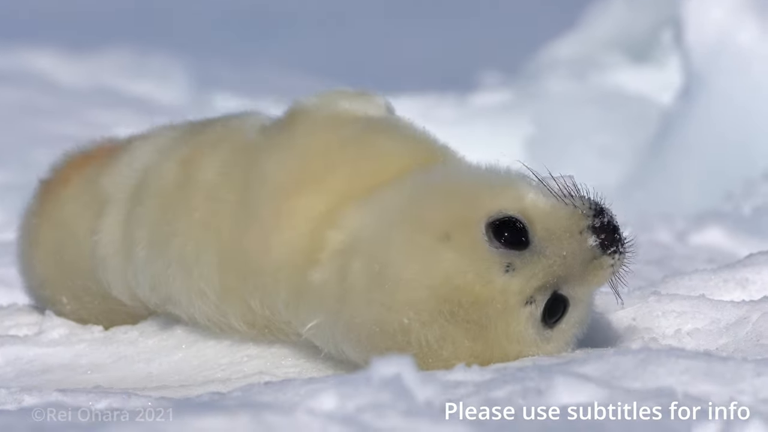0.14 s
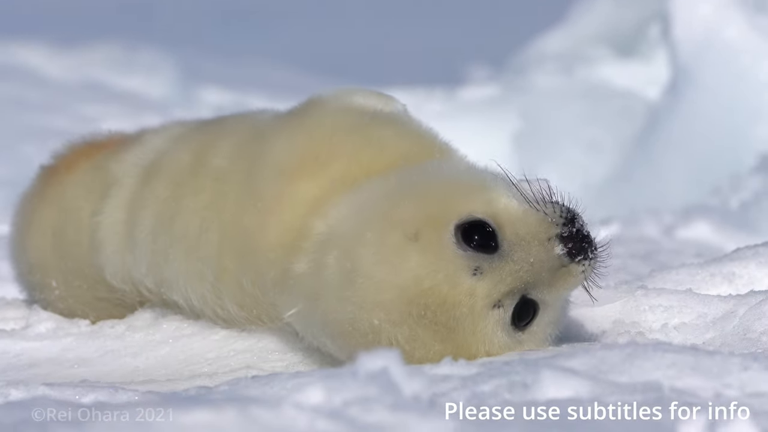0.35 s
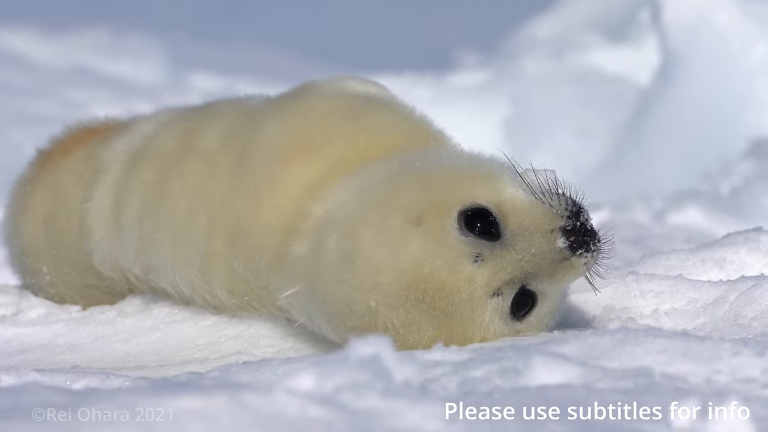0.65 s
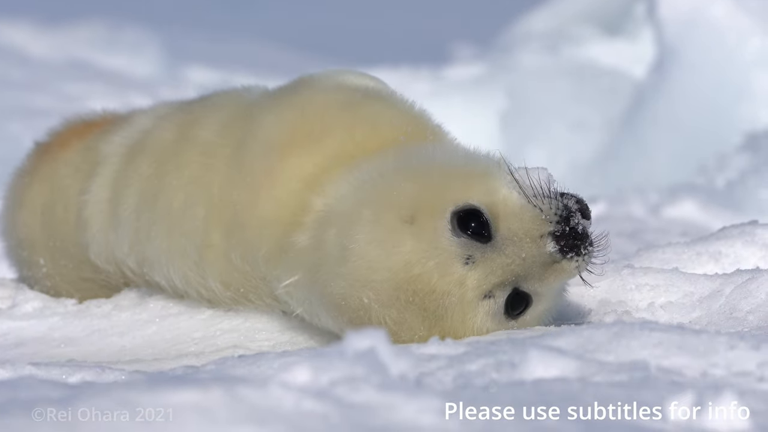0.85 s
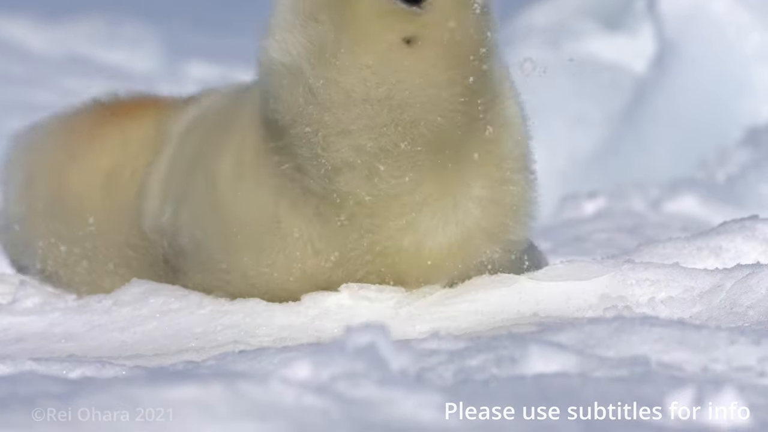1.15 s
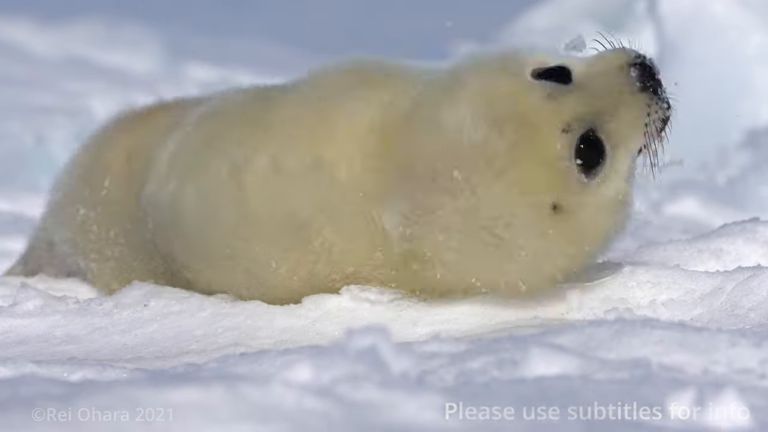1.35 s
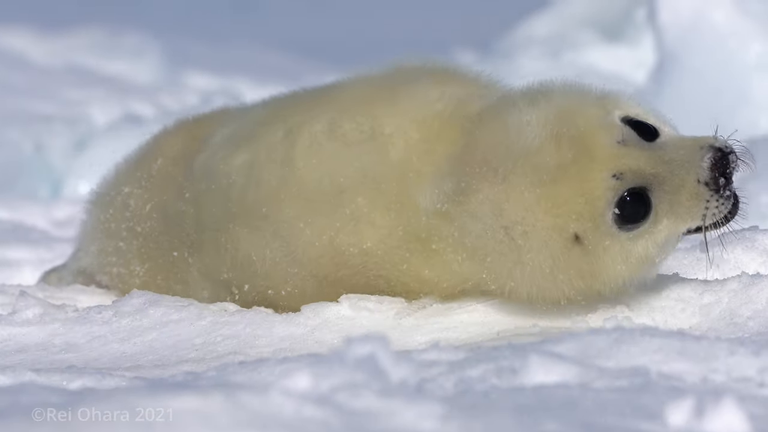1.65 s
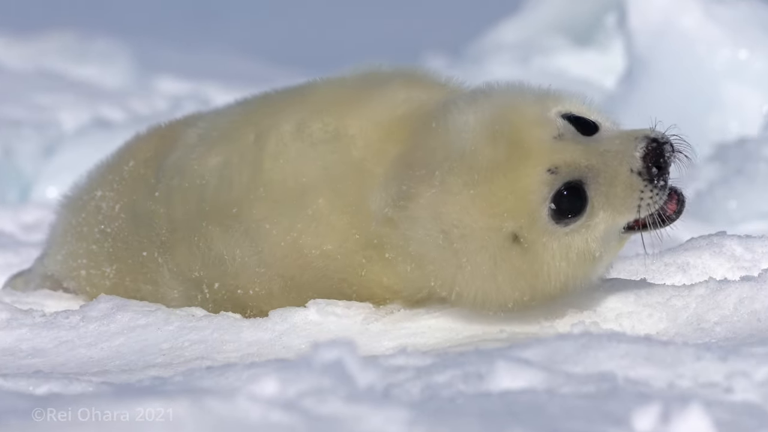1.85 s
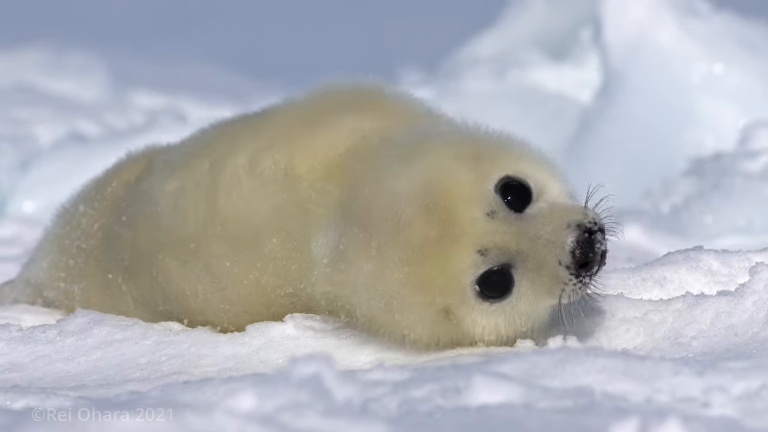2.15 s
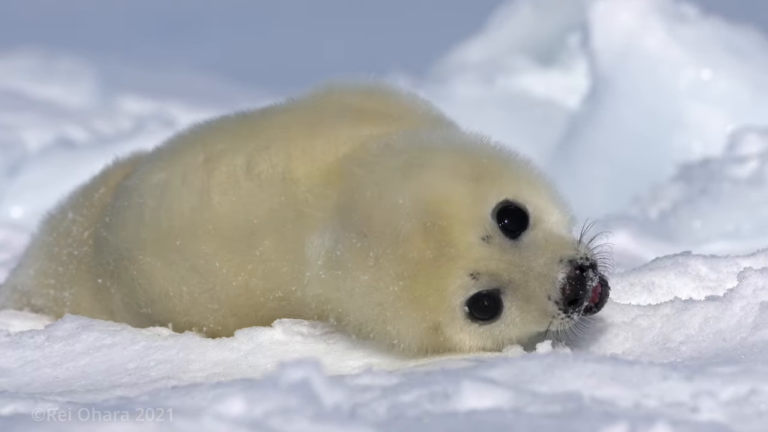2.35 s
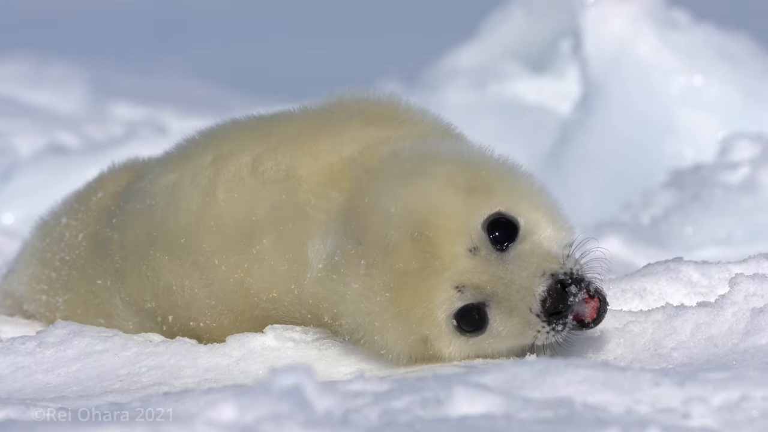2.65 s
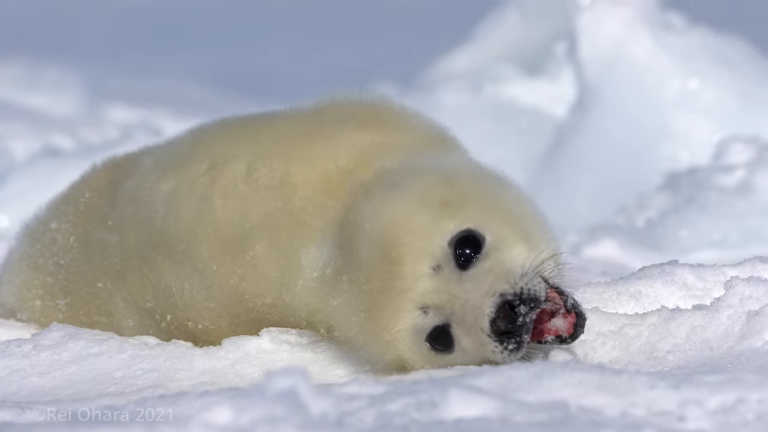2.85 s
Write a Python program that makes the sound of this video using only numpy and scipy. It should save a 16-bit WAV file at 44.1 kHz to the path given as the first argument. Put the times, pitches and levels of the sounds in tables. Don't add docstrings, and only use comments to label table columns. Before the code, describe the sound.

Two hoarse, baby-like seal pup cries break out after a stretch of low, fluttering wind.

```python
import sys
import numpy as np
from scipy import signal
from scipy.fft import rfft, irfft, next_fast_len
from scipy.io import wavfile
from scipy.ndimage import uniform_filter1d

SR = 44100
rng = np.random.default_rng(int(sys.argv[2]) if len(sys.argv) > 2 else 0)


def undo_db(level):
    steps = np.asarray(level, float) / 20
    return 10 ** steps


def master(y):
    cut = np.clip(np.atleast_2d(y).T, -1, 1)
    pcm = np.round(cut * 32767)
    wavfile.write(sys.argv[1], SR, pcm.astype(np.int16))


N = 132300

# time in seconds, pitch in Hz, level in dB,
# mouth opening as a factor on the throat resonances, strain in dB, breath in dB.
FIRST_CRY_SWELLS = [
    (1.54, 182, -75, 0.22, -5, -4),
    (1.575, 215, -60.5, 0.57, -19.5, -12),
    (1.594, 253.2, -51, 0.75, -29, -12),
    (1.62, 339.4, -48, 0.76, -10.5, -7),
    (1.665, 365, -42.5, 0.95, -11.5, -13.5),
    (1.705, 392.9, -37.5, 0.99, -3, -20),
    (1.719, 415, -36.5, 0.91, -13, -19),
    (1.728, 374, -36.5, 1, -6, -18),
]
FIRST_CRY_HELD = [
    (1.744, 399.4, -34, 0.87, -25, -22),
    (1.759, 408.4, -36, 1.08, -6, 3.5),
    (1.781, 412.3, -35, 0.93, -9, -4),
    (1.805, 410, -37, 0.94, -4.5, -2),
    (1.832, 438.6, -35, 0.93, -8.5, -3),
    (1.904, 442.7, -36.5, 0.96, -7, -4.5),
    (1.924, 459.3, -35, 0.97, -9.5, -7.5),
    (1.95, 472.5, -37.5, 1.03, -6.5, -1),
]
FIRST_CRY_CREAKS = [
    (1.958, 331, -41.5, 0.92, -4, -8),
    (1.976, 314.7, -43.5, 0.96, -16, -7),
    (1.996, 287, -49.5, 1, -16, -2),
    (2.011, 249, -52.5, 0.76, -5, 5),
    (2.019, 214, -65, 0.78, -6, 0),
    (2.042, 191, -72, .9, 0, 9),
]
SECOND_CRY = [
    (2.661, 209, -37.5, 0.98, 11.5, 4),
    (2.668, 212.5, -38, 0.89, -2, 5.5),
    (2.696, 241.5, -32.5, 1.08, 2, -7.5),
    (2.72, 310.8, -32, 1.07, 3.5, -11),
    (2.751, 365.8, -33.5, 0.93, 4, -15),
    (2.781, 406.1, -33, 0.99, 4.5, -16),
    (2.821, 425, -33, 1.063, 3, 4),
    (2.87, 443, -32.5, 1.05, -2.7, -2.5),
    (3.0, 460.2, -32.5, 1.052, -0.5, -3.5),
]
# time in seconds, half length in seconds, roughness 0-1, pitch dip as a share.
FOLD_CATCHES = [(1.711, .003, .06, .01), (1.724, .003, .2, .02), (1.738, .004, .08, .0),
                (1.756, .003, .15, .01), (1.772, .005, .5, .04), (1.796, .007, .18, .02),
                (1.954, .003, .4, .0), (2.004, .006, .25, .0), (2.03, .012, .5, .0), (2.705, .012, .07, .0),
                (2.83, .006, .06, .0), (2.958, .007, .07, .003)]
# time in seconds, lift of one high band of harmonics in dB.
LARYNX_LIFT = [(1.6, 8), (1.7, -9), (1.77, 9.5), (1.81, 1), (1.825, -10), (1.915, -12), (1.945, 5.5),
               (1.97, -1), (2.66, -10), (2.7, -7), (2.725, -4), (2.82, 2), (2.9, 0.5), (3.0, -13)]
# resonance in Hz, width in Hz, level in dB.
HEAD_ASIDE = [
    [(420, 460, -10.5), (1210, 277, 5.5), (1700, 396, -2), (2030, 400, -8.5)],
    [(3130, 1160, -15.5), (4160, 1900, -26.5), (6170, 1100, -29)],
    [(7600, 640, -38), (10700, 2600, -48), (13200, 1700, -49)],
]
HEAD_FACING = [
    [(415, 190, -5.5), (1423, 510, 3), (1890, 550, -1), (2420, 260, -7.5)],
    [(3380, 1300, -20.5), (5020, 1780, -24.5), (6260, 440, -27.5)],
    [(8630, 1000, -42.5), (10400, 2600, -49.5), (14500, 1900, -58.5)],
]
# centre in Hz, width in Hz, depth in dB.
SIDE_CAVITIES = [
    (1060, 120, -8),
    (7350, 300, -10),
]
# time in seconds, centre in Hz.
SNOW_ECHO_NOTCH = [(1.76, 14300), (1.81, 13500), (1.88, 12500), (1.96, 12200), (2.665, 8900), (2.72, 10200),
                   (2.8, 11800), (2.9, 12800), (3.0, 13000)]
# start in seconds, level in dB, pitch in Hz.
ICE_PINGS = [
    (2.552, -65.5, 5800),
    (2.556, -48, 1800),
    (2.556, -58.5, 4600),
    (2.557, -67, 6400),
    (2.592, -54.5, 1700),
]
# start in seconds, level in dB.
CRUST_TICKS = [(0.517, -68), (0.7298, -63.5), (1.0904, -73.5), (1.1044, -61), (1.121, -61.5), (1.3747, -62),
               (1.4473, -57), (1.4594, -67.5), (1.48, -61), (1.5329, -57), (2.4317, -65), (2.4626, -61.5),
               (2.5556, -64), (2.5665, -60)]
# start in seconds, level in dB.
FUR_SLIDES = [
    (1.085, -77.5),
    (1.44, -83.5),
    (2.25, -81.5),
]
# frequency in Hz, level in dB.
SNOW_SPECTRUM = [(1500, -18), (3000, -0.5), (5500, -2.5), (10000, -6), (15500, -10)]
# time in seconds, gust level in dB, roar above the rumble in dB.
WIND_GUSTS = [(0.0, -33.5, 3), (0.39, -29, 5.1), (0.42, -23.5, 3.5), (0.81, -31.5, 5.9), (1.04, -24.5, 1.6),
              (1.2, -36.5, 8.2), (1.27, -27.5, -6), (1.39, -36, 0.5), (1.44, -29.5, -3.5), (1.7, -34.5, 3),
              (1.73, -30, -3.2), (2.0, -31.5, 3.7), (2.07, -41, 5.5), (2.31, -44.5, 2.5),
              (2.36, -30.5, -3.3), (2.71, -28.5, 8), (2.77, -43.5, -8.5), (3.0, -43.5, 7.5)]
# frequency in Hz, level in dB.
RUMBLE_SPECTRUM = [(14, -45.5), (26, -12.5), (55, 5.5), (110, -1.5), (236, -17), (450, -37), (1000, -60),
                   (2000, -88.5)]
# start in seconds, peak level in dB.
WINDSCREEN_BUFFETS = [
    (0.407, -20),
    (1.25, -22),
    (1.428, -24),
    (1.57, -26),
    (1.742, -25),
    (1.815, -20),
    (1.965, -22.5),
    (2.119, -34.5),
    (2.346, -27),
    (2.495, -20.5),
]
# start in
# seconds, level in dB.
STRONG_FLAPS = [(0.0333, -83), (0.0633, -89), (0.1116, -59), (0.1605, -66), (0.1878, -58.5), (0.2199, -49.5),
                (0.2698, -56), (0.3172, -56.5), (0.3533, -58), (0.4035, -60.5), (0.423, -67.5),
                (0.4953, -54), (0.5168, -57), (0.5448, -56), (0.6014, -51), (0.631, -78), (0.7014, -68.5),
                (0.7114, -61), (0.749, -60), (0.778, -58.5), (0.815, -79), (0.8435, -72), (0.8675, -59.5),
                (0.9018, -63.5), (0.933, -54.5), (0.9652, -59), (0.974, -56), (1.0246, -65), (1.0355, -53.5),
                (1.076, -73), (1.127, -77.5), (1.1507, -75), (1.1972, -64.5), (1.299, -73), (1.3553, -62.5),
                (1.4194, -65.5), (1.5095, -76), (1.5394, -66.5),
                (0.667, -67), (1.556, -67), (2.016, -54), (2.034, -58), (2.0496, -53), (2.1014, -59.5),
               (2.1462, -63), (2.3494, -76), (2.387, -70.5), (2.427, -66), (2.449, -69), (2.4818, -61.5),
               (2.5162, -81), (2.578, -58), (2.61, -83.5), (2.617, -57), (2.624, -57), (2.639, -55)]
# frequency in Hz, level in dB.
FLAP_SPECTRUM = [(400, 2.5), (800, 2), (1150, -3.5), (1750, 2), (2300, -13), (3200, -23), (4500, -39.5)]
# frequency in Hz, level in dB.
FLUTTER_SPECTRUM = [(500, 6), (900, -1), (1700, -0.6), (2200, -14), (3000, -27.5), (4500, -39.5)]
# frequency in Hz, level in dB.
HISS_SPECTRUM = [(500, 0.5), (1000, -14), (2000, -14), (3000, -21), (5000, -25.5), (9000, -27),
                 (16000, -29.5)]
# frequency in Hz, level in dB.
WHINE_TONES = [(14606, -95)]

ROUGH, CALL_ROUGH = .036, .022
TIRING_DB_PER_S = 24


def evened(x):
    return x / np.sqrt(np.mean(x ** 2) + 1e-20)


def read(points, hz):
    f, value = np.transpose(points)
    return np.interp(np.log(hz + 1), np.log(f + 1), value, left=-90, right=-90)


def colour(x, gain_db):
    size = next_fast_len(len(x) + 2048)
    gain = undo_db(gain_db(np.fft.rfftfreq(size, 1 / SR)))
    return irfft(rfft(x, size) * gain, size)[:len(x)]


def slow(size):
    return evened(uniform_filter1d(uniform_filter1d(rng.standard_normal(N), size), size))


def resonate(x, hz, width):
    turn = np.exp(2j * np.pi * np.cumsum(hz * np.ones(len(x))) / SR)
    r = np.exp(-np.pi * width / SR)
    return 2 * (turn * signal.lfilter([(1 - r) ** 2], [1, -2 * r, r * r], x / turn)).real


def cry(rows, rough, head, tiring_db_per_s):
    s, *columns = np.transpose(rows)
    first = round(s[0] * SR)
    t = np.arange(first, min(N, round(s[-1] * SR))) / SR
    curves = (uniform_filter1d(np.interp(t, s, c), size=200) for c in columns)
    hz, level_db, mouth, strain_db, breath_db = curves
    catch, turns = vocal_folds(t, hz, rough)
    tract = throat(head, hz, mouth, strain_db, breath_db)
    voice = fold_harmonics(t, hz, catch, turns, tract)
    tired_rough = rough * undo_db(tiring_db_per_s * (t - t[0]))
    voice = voice + breath_puffs(tired_rough, catch, turns, tract)
    voice = colour(voice, lambda f: sum(db * np.exp(-.5 * ((f - c) / w) ** 2) for c, w, db in SIDE_CAVITIES))
    notch_hz = np.interp(t, *np.transpose(SNOW_ECHO_NOTCH))
    voice = voice - .8 * resonate(voice, notch_hz, 1500)
    voice = voice / np.sqrt(uniform_filter1d(voice ** 2, size=900))
    fade_end = s[-1] + (s[-1] > 2.9)
    edge = np.clip(np.minimum(t - s[0], fade_end - t) / .002, 0, 1)
    out = np.zeros(N)
    out[first:first + len(t)] = voice * edge * undo_db(level_db)
    return out


def vocal_folds(t, hz, rough):
    near = [np.exp(-.5 * ((t - at) / half) ** 2) for at, half, _, _ in FOLD_CATCHES]
    catch = sum(n * c[2] for n, c in zip(near, FOLD_CATCHES))
    dipped_hz = hz * (1 - sum(n * c[3] for n, c in zip(near, FOLD_CATCHES)))
    jitter = .008 * ((rough + catch) / ROUGH) ** .5 * slow(size=90)[:len(t)]
    return catch, np.cumsum(dipped_hz * (1 + jitter)) / SR


def throat(head, hz, mouth, strain_db, breath_db):
    moving, upper, air = head
    tense_db = [0, 0, 0, 17.5 * np.log2(hz / 440)]
    edge_db = [0, 0, .6 * breath_db]
    # Hz, width in Hz, gain, whether catches rasp in it
    tract = [(f * mouth, w, undo_db(db + d), 1) for (f, w, db), d in zip(moving, tense_db)]
    tract += [(f, w, undo_db(db + strain_db + d), 1) for (f, w, db), d in zip(upper, edge_db)]
    tract += [(f * (hz / 440) ** .12, w, undo_db(db + breath_db), 0) for f, w, db in air]
    return tract


def fold_harmonics(t, hz, catch, turns, tract):
    k = np.arange(1, 60)[:, None]
    power = sum(g ** 2 / (1 + (2 * (k * hz - f) / w) ** 2) ** 2 for f, w, g, _ in tract)
    chance = rng.standard_normal((N // 300, 59)).T
    step, part = np.divmod(np.arange(len(t)) / 350, 1)
    step = step.astype(int)
    waver = chance[:, step] * (1 - part) + chance[:, step + 1] * part
    shrill_db = np.interp(t, *np.transpose(LARYNX_LIFT))
    narrowed_db = shrill_db / (1 + (3670 / (k * hz)) ** 12) / (1 + (k * hz / 5610) ** 12)
    shimmer_db = 2.2 * waver * np.minimum(k / 8, 1) ** 2
    power = power * undo_db(2 * narrowed_db + 2 * shimmer_db)
    lag = sum(np.arctan(2 * (k * hz - f) / w) for f, w, _, _ in tract[1:3])
    waves = np.sqrt(power) * (k * hz < 15500) * np.cos(2 * np.pi * k * turns - lag)
    voice = (1 - catch) * np.sqrt(hz / 400) * waves.sum(0)
    return voice * (1 + .5 * catch * np.cos(np.pi * turns))


def breath_puffs(rough, catch, turns, tract):
    gate = 4 * (.25 + np.exp(-(turns % 1) / .3))
    puffs = 0
    for f, w, g, raspy in tract:
        centre = np.mean(f)
        lift = rough * undo_db(11.5 * abs(np.log2(centre / 1000)))
        lift = lift + 2 * catch * raspy * (700 < centre < 4800)
        patches = undo_db(2.8 * slow(size=600)[:len(turns)])
        noise = rng.standard_normal(N)[:len(turns)]
        puffs = puffs + g * resonate(lift * gate * patches * noise, f, w)
    return puffs


def ice_pings():
    t, decay_s = np.arange(N) / SR, .0013
    return sum(undo_db(db) * np.sin(2 * np.pi * hz * (t - s)) * (t > s) * np.exp(-abs(t - s) / decay_s)
               for s, db, hz in ICE_PINGS)


def bursts(rows, length_s, spectrum, trim_db):
    t, shape = np.arange(N) / SR, np.zeros(N)
    for s, db in rows:
        u = np.clip((t - s) / length_s, 0, 30)
        shape += undo_db(db + trim_db) * (1 - np.exp(-8 * u)) * np.exp(-u)
    noise = colour(rng.standard_normal(N), lambda f: read(spectrum, f))
    return shape * noise / np.sqrt(uniform_filter1d(noise ** 2, size=200))


def snow_contact():
    ticks = bursts(CRUST_TICKS, .0014, SNOW_SPECTRUM, -7)
    return ticks + bursts(FUR_SLIDES, .041, SNOW_SPECTRUM, 0)


def gust_db(column=1):
    rows = np.transpose(WIND_GUSTS)
    return np.interp(np.arange(N) / SR, rows[0], rows[column])


def buffet_db():
    t, gust, length_s = np.arange(N) / SR, gust_db(), .018
    lift = np.zeros(N)
    for s, db in WINDSCREEN_BUFFETS:
        height_db = np.clip(db - 3.5 - gust[round(s * SR)], -8, 9)
        lift += height_db * np.exp(-((t - s - length_s) / length_s) ** 2)
    return lift


def wind():
    frames = N // 256 + 5
    a, b, patches = rng.standard_normal((frames, 513, 3)).T
    patches = evened(uniform_filter1d(uniform_filter1d(patches, size=4, axis=0), size=6, axis=1))
    cells = (a + 1j * b) * undo_db(1.8 * patches)
    noise = signal.istft(cells, nperseg=1024, noverlap=768)[1][:N]
    lumps = undo_db(.8 * slow(size=700))
    noise = evened(colour(noise * lumps, lambda f: read(RUMBLE_SPECTRUM, f)))
    noise = noise / np.sqrt(uniform_filter1d(uniform_filter1d(noise ** 2, size=3500), size=3500))
    rumble = colour(noise, lambda f: -40 / (1 + (f / 166) ** 4))
    roar, low = rumble, noise - rumble
    steady = roar / np.sqrt(uniform_filter1d(roar ** 2, size=5000) / np.mean(roar ** 2))
    return undo_db(gust_db()) * (low + steady * undo_db(gust_db(column=2))) * undo_db(buffet_db())


def windscreen_flaps():
    return bursts(STRONG_FLAPS, .0078, FLAP_SPECTRUM, -2.5)


def flutter():
    per_s, level_db = 93, -74.5
    hits = undo_db(5 * np.minimum(rng.exponential(1, N), 3)) * (rng.random(N) < per_s / SR)
    hits = np.minimum(hits, 2.5)
    shape = evened(.24 + signal.oaconvolve(hits, np.hanning(260))[:N])
    noise = evened(colour(rng.standard_normal(N), lambda f: read(FLUTTER_SPECTRUM, f)))
    return undo_db(level_db + .99 * (gust_db() + 29)) * shape * noise


def scene():
    first_rows = FIRST_CRY_SWELLS + FIRST_CRY_HELD + FIRST_CRY_CREAKS
    pup = cry(first_rows, ROUGH, HEAD_ASIDE, 0) + cry(SECOND_CRY, CALL_ROUGH, HEAD_FACING, TIRING_DB_PER_S)
    snow = ice_pings() + snow_contact()
    return (pup + snow + wind() + windscreen_flaps() + flutter())[None]


def preamp_hiss():
    return undo_db(-79) * evened(colour(rng.standard_normal(N), lambda f: read(HISS_SPECTRUM, f)))


def whine():
    t = np.arange(N) / SR
    return sum(undo_db(db) * np.sqrt(2) * np.sin(2 * np.pi * hz * t) for hz, db in WHINE_TONES)


def low_pass(x):
    return signal.sosfilt(signal.butter(12, 15760, fs=SR, output="sos"), x)


def record(dry):
    return low_pass(dry + preamp_hiss() + whine())


dry = scene()
out = record(dry)
master(out)
```